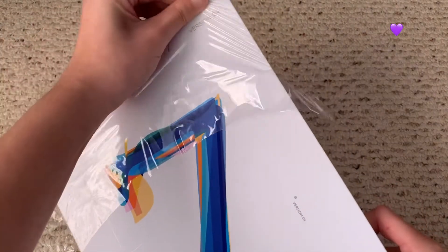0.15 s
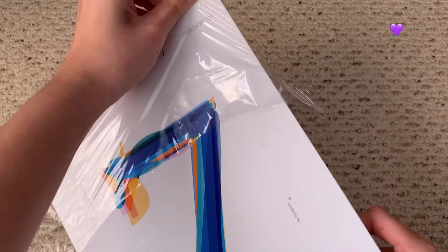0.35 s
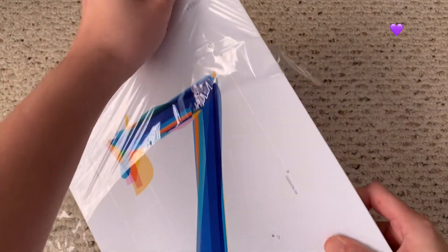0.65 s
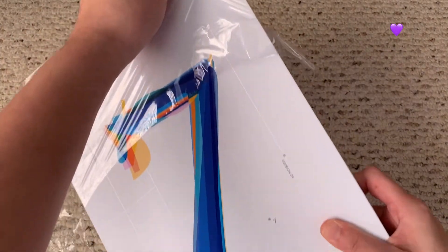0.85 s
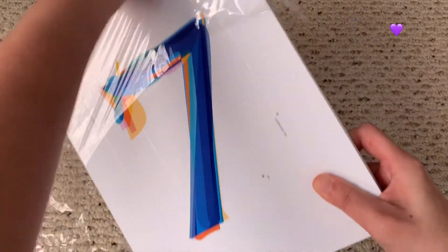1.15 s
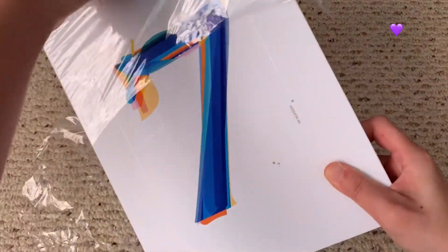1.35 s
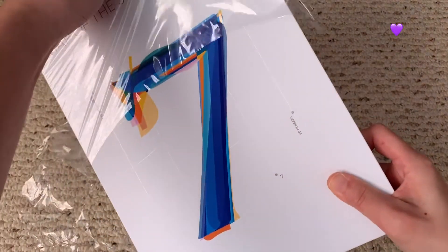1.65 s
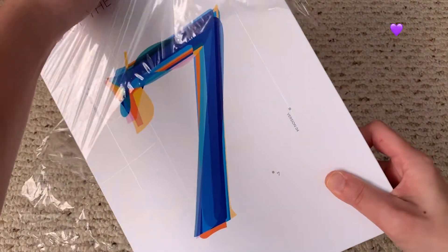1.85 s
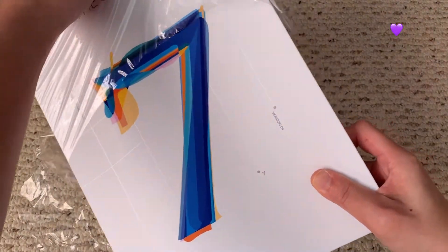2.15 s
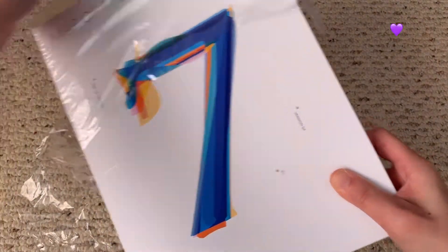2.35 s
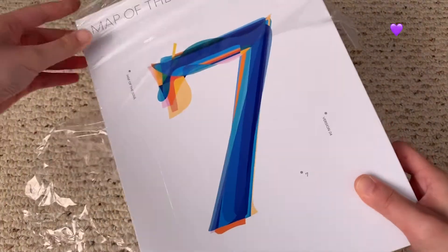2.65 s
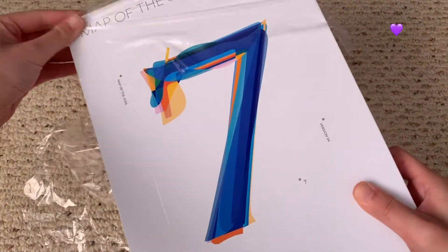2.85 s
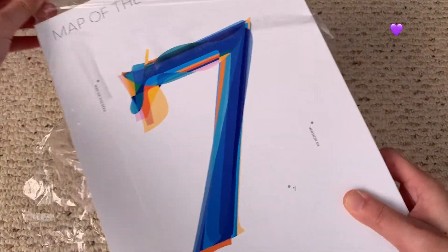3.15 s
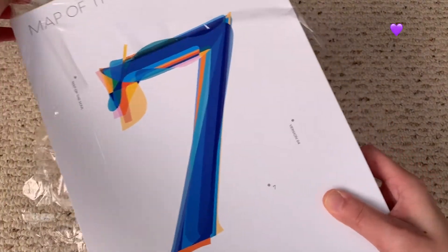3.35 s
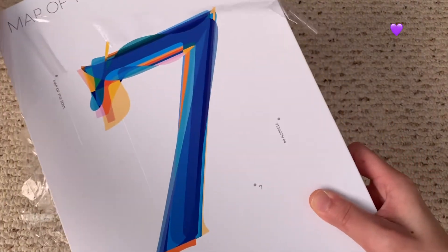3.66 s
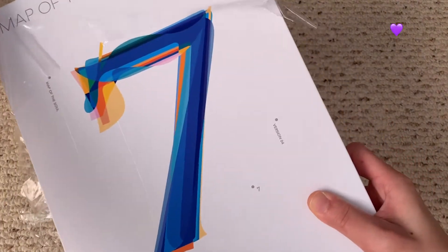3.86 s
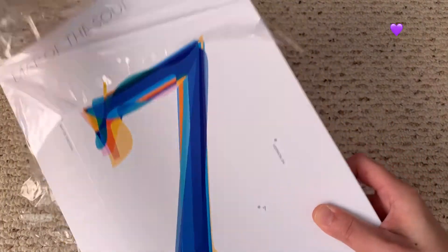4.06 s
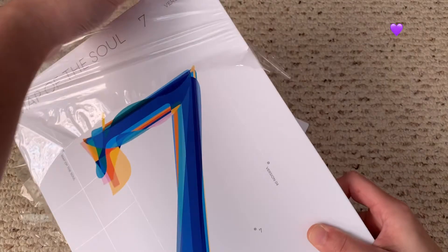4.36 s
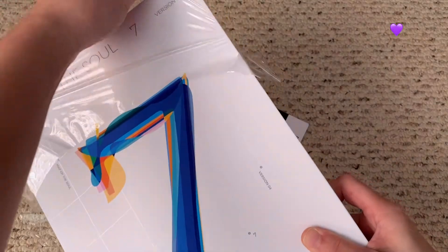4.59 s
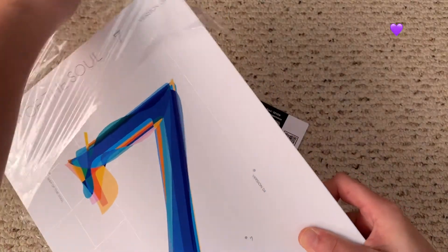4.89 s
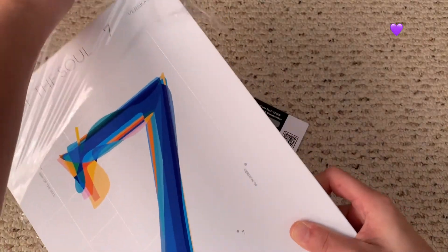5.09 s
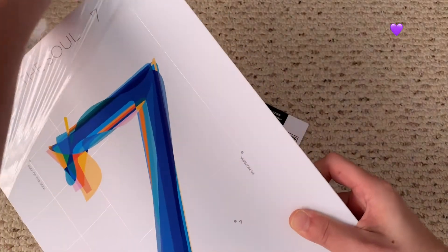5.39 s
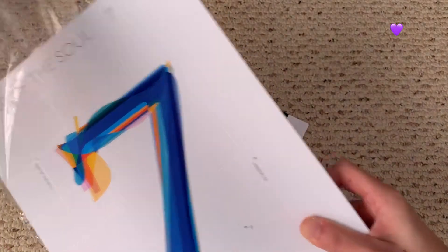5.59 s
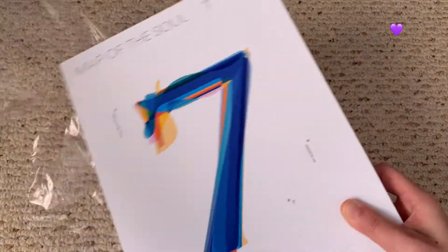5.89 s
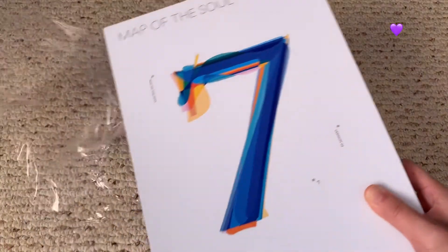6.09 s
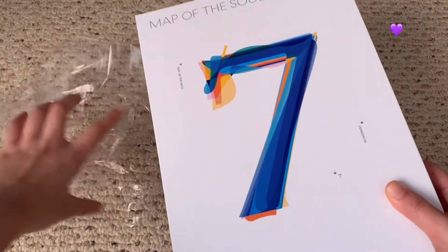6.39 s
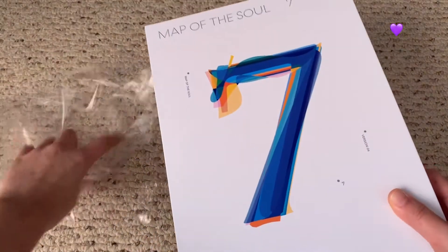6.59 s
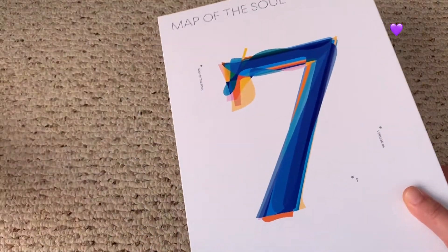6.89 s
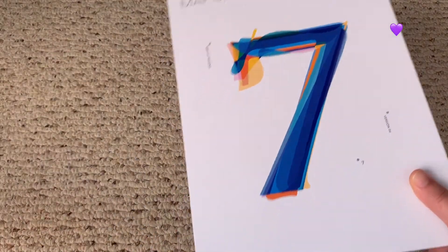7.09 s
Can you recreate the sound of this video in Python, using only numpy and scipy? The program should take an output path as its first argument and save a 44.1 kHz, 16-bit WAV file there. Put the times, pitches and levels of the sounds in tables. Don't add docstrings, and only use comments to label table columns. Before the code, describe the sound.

Thin plastic film crinkles and snaps in short bursts as it is peeled off a hollow cardboard box, pops loudly once, then rustles free.

```python
import sys
import numpy as np
from scipy import signal
from scipy.fft import rfft, irfft, next_fast_len
from scipy.io import wavfile
from scipy.ndimage import uniform_filter1d

SR = 44100
rng = np.random.default_rng(int(sys.argv[2]) if len(sys.argv) > 2 else 0)


def transcribe(u):
    v = np.clip(np.atleast_2d(u).T, -1, 1)
    q = np.round(v * 32767).astype(np.int16)
    wavfile.write(sys.argv[1], SR, q)


def volts_from_decibels(level):
    exponent = np.asarray(level, float) / 20
    return 10 ** exponent


N = 319128

FREE_S = 5.84
TAUT_HZ = 9440


def rms_one(x):
    return x / np.sqrt(np.mean(x ** 2) + 1e-20)


def in_time(rows):
    s, *columns = np.transpose(rows)
    return [np.interp(np.arange(N) / SR, s, column) for column in columns]


def at_hz(points, hz):
    point_hz, point_db = np.transpose(points)
    return np.interp(np.log(hz), np.log(point_hz), point_db)


def drift(rate):
    r = np.exp(-80 * np.pi * rate / SR)
    slow = signal.lfilter([1], [1, -2 * r, r * r], rng.standard_normal(N // 40 + 2002))[2000:]
    return np.interp(np.arange(N) / 40, np.arange(len(slow)), rms_one(slow))


def ring(push, hz, t60):
    r, w = volts_from_decibels(-60 / (t60 * SR)), 2 * np.pi * hz / SR
    return signal.lfilter([0, np.sin(w)], [1, -2 * r * np.cos(w), r * r], push + 1e-18)


def band(x, low_hz, high_hz):
    edges_hz = [low_hz, min(high_hz, .45 * SR)]
    return signal.sosfilt(signal.butter(2, edges_hz, "band", fs=SR, output="sos"), x)


def peak(x, hz, width_hz, db):
    g, w = volts_from_decibels(db / 2), 2 * np.pi * hz / SR
    a = np.pi * width_hz / SR
    return signal.lfilter([1 + a * g, -2 * np.cos(w), 1 - a * g], [1 + a / g, -2 * np.cos(w), 1 - a / g], x)


def clicks(per_s, spread_db, clump_db):
    sizes = volts_from_decibels(spread_db * np.minimum(rng.exponential(1, N), 5)) * rng.choice([-1, 1], N)
    chance = per_s * volts_from_decibels(clump_db * drift(25)) / SR
    return sizes * (rng.random(N) < chance)


def crinkle(spectrum, per_s, cycles, spread_db, clump_db, count=14):
    train = clicks(per_s, spread_db, clump_db)
    patch = rng.integers(0, count, N)
    total = np.zeros(N)
    for k, hz in enumerate(np.geomspace(spectrum[1][0], spectrum[-2][0], count)):
        total += volts_from_decibels(at_hz(spectrum, hz)) * hz * ring(train * (patch == k), hz, cycles / hz)
    return rms_one(total)


def room_tone():
    # (frequency [Hz], level per Hz [dB])
    air = [(18, -50), (30, 10.5), (79, 18.5), (216, 6.5), (1220, -18), (2560, -9.5), (4520, -16),
           (7590, -36), (8380, -21), (11000, -37), (14300, -19), (22000, -120)]
    size = next_fast_len(N)
    hz = np.maximum(np.fft.rfftfreq(size, 1 / SR), 10)
    mid, side = rfft(rng.standard_normal((2, size))) * volts_from_decibels(at_hz(air, hz))
    alike = 0.85 / (1 + (hz / 700) ** 3)
    both = np.sqrt(1 + alike) * mid + np.sqrt(1 - alike) * side * [[1], [-1]]
    return volts_from_decibels(-75) * rms_one(irfft(both, size)[:, :N])


def room(x):
    t60_s, wall_cut_hz = .22, 10000
    size = next_fast_len(N + SR)
    w = 2 * np.pi * np.fft.rfftfreq(size)
    dull = 1 / (1 + 1j * w * SR / (2 * np.pi * wall_cut_hz))
    walls = np.zeros((2, len(w)), complex)
    for k, lag in enumerate((rng.uniform(.004, .03, 16) * SR).astype(int)):
        loop = volts_from_decibels(-60 * lag / SR / t60_s) * np.sqrt(dull) * np.exp(-1j * w * lag)
        walls[k % 2] += (-1) ** (k // 2) * loop / (1 - loop)
    walls /= np.sqrt(np.mean(np.abs(walls) ** 2, axis=1, keepdims=True))
    tail = irfft(rfft(x, size) * walls, size)[:, :N]
    return band(band(tail, 1800, 21000), 234, 25000)


def bumps():
    # (time [s], peak level [dB])
    shifts = [(1.195, -57.5), (1.548, -64), (2.239, -59), (2.745, -69), (2.896, -57), (2.994, -67),
              (3.939, -61.5), (4.463, -65), (4.638, -62), (4.728, -55), (5.513, -51), (6.438, -68.5),
              (6.62, -59.5), (6.75, -60), (1.37, -63.5), (5.75, -67.5), (7.09, -61)]
    push = np.zeros(N)
    for s, db in shifts:
        push[round(s * SR)] = volts_from_decibels(db + 6.5)
    push = band(push, 32, 260)
    return ring(push, 85, 0.17) + volts_from_decibels(-2) * ring(push, 144, 0.2)


def box(push):
    # (frequency [Hz], level [dB], time to fall 60 dB [s])
    modes = [(185.4, -8.5, 0.026), (292.6, -3.5, 0.039), (381, -2, 0.042), (578, 1, 0.013),
             (810, -3.5, 0.019), (1213, -1, 0.0095)]
    return sum((-1) ** k * volts_from_decibels(db) * ring(push, hz, t60) for k, (hz, db, t60) in enumerate(modes))


def knocks(snapped):
    # (time [s], peak level [dB])
    tugs = [(0.113, -49.5), (0.186, -56.5), (0.251, -43.5), (0.271, -48.5), (0.972, -51.5), (1.199, -40),
            (1.265, -42.5), (1.35, -56), (1.536, -46.5), (1.608, -51.5), (1.879, -58), (2.233, -50),
            (2.248, -39.5), (2.622, -64), (2.748, -55), (2.896, -45), (3.013, -49), (3.034, -47.5),
            (3.076, -42), (3.108, -43.5), (3.183, -48.5), (3.905, -52), (3.922, -47), (3.964, -45.5),
            (4.376, -53), (4.465, -52), (4.627, -39), (4.746, -41), (5.519, -36), (5.537, -45)]
    late_s, answer_db = 0.00399, -21
    answers = [(s + late_s, coarse_db + answer_db) for s, db, hz, coarse_db in snapped]
    s, db = np.transpose(tugs + answers)
    push = np.zeros(N)
    np.add.at(push, ((s - .004) * SR).astype(int), volts_from_decibels(db + 5.5) * rng.choice([-1, 1], len(s)))
    return box(band(push, 67, 1500))


def handling():
    # (time [s], level [dB])
    tension = [(0, -60), (.3, -74), (.8, -79), (1.1, -66.5), (1.77, -73), (2.35, -81), (2.69, -82),
               (3.26, -68), (3.57, -72), (3.86, -71), (4.03, -85), (4.3, -85), (4.6, -64), (5.07, -72),
               (5.48, -58), (5.96, -64), (6.4, -71), (7.24, -61)]
    # (peak time [s], fine crinkle [dB], time to fade 20 dB [s],
    # large folds against fine crinkle [dB])
    pulls = [(.07, -52.5, .26, -12), (.26, -44.5, .055, -5.5), (.375, -63.5, 0.2, -15),
             (.53, -72, 0.5, -10), (.75, -72.5, 0.4, 2.5), (.86, -68, 1, -20), (.98, -57, 0.18, -3),
             (1.2, -47.5, 0.34, -2.5), (1.44, -49, .24, -5), (1.549, -51.5, 0.29, -1.5),
             (1.89, -61, 0.15, -1.5), (2.244, -40.5, .06, -6), (2.77, -48.5, .4, -12),
             (2.9, -46.5, 0.12, -10), (3.009, -45.5, 0.28, -6), (3.11, -51, 0.18, -5),
             (3.42, -62.5, .33, -10), (3.69, -62, 0.36, -13), (3.915, -42, 0.0665, 0.5),
             (4.38, -53, 0.42, 0), (4.46, -55.5, .11, -4), (4.629, -44.5, .24, 1), (4.74, -49.5, 0.1165, 3),
             (2.195, -53.5, 0.11, -5), (5.55, -47, .2, -3), (5.7, -47.5, 0.27, -10),
             (1.35, -58.5, 0.24, 5.5), (1.64, -60.5, 0.16, -1), (3.959, -47, 0.05, -8),
             (4.341, -58.5, .2, 0.5)]
    # (peak time [s], fine crinkle [dB],
    # time to fade 20 dB [s], large folds against fine crinkle [dB])
    swings = [(5.88, -54.5, .11, -8.5), (6.04, -60, .31, -7), (6.12, -53.5, .21, -12.5),
              (6.19, -45.5, .25, -17.5), (6.27, -53.5, .13, -12.5), (6.325, -52.5, .045, -9.5),
              (6.45, -60.5, .31, -17.5), (6.575, -43, .31, -9), (6.635, -39, .27, -7),
              (6.72, -47.5, .17, -10.5), (6.83, -55, .3, -5), (6.915, -50, .18, -5), (6.965, -55, .08, -5),
              (7.1, -65, .3, -6)]
    creep_fold_db, creep_rub_db = -9, -15
    pull_rub_db = -3
    free_rub_db = -5
    t = np.arange(0, N, 64) / SR
    creep = volts_from_decibels(np.interp(t, *np.transpose(tension)))
    s, db, fade_s, fold_db = np.transpose(pulls + swings)[:, :, None]
    rise = np.where(s > FREE_S, 167, 400)
    below_peak_db = np.where(t < s, rise * (s - t), 20 * (t - s) / fade_s)
    pull = volts_from_decibels(db - below_peak_db)
    folded = np.sum((pull * volts_from_decibels(fold_db)) ** 2, axis=0)
    held = volts_from_decibels(free_rub_db * (t > FREE_S))
    fine_power = creep ** 2 + np.sum(pull ** 2, axis=0)
    fold_power = (creep * volts_from_decibels(creep_fold_db)) ** 2 + folded
    rub_power = ((creep * volts_from_decibels(creep_rub_db)) ** 2 + folded * volts_from_decibels(pull_rub_db) ** 2) * held ** 2
    return in_time(np.column_stack([t, *(10 * np.log10([fine_power, fold_power, rub_power]))]))


def rubbing(rub_db):
    return volts_from_decibels(rub_db - 4) * rms_one(box(clicks(per_s=1200, spread_db=5.5, clump_db=3.5)))


def folds(fold_db):
    # (frequency [Hz], level per Hz [dB])
    coarse = [(410, -30), (700, -3), (1200, 2), (1700, -22.5), (2500, 12), (3200, 12.5), (4300, -25)]
    return volts_from_decibels(fold_db - 7) * crinkle(coarse, per_s=2500, cycles=1.2, spread_db=2.5, clump_db=6.0, count=10)


def ticks():
    train = clicks(per_s=450, spread_db=2.2, clump_db=4.0)
    slips = signal.lfilter([1], [1, -.93], np.abs(train)) * rng.standard_normal(N)
    return rms_one(band(slips, 7200, 19000))


def rustle(fine_db):
    # (frequency [Hz], level per Hz [dB])
    small = [(2000, -30), (3200, 12), (4300, 4.5), (5500, -18.5), (7000, 11), (8600, -2), (10500, 12.5),
             (13000, 7), (15500, -16.5), (17000, -10)]
    # (frequency [Hz], width [Hz], lift [dB])
    free_ring = (4200, 1800, 2.5)
    shared = crinkle(small, per_s=3500, cycles=8.0, spread_db=3.5, clump_db=5.0)
    own = np.array([crinkle(small, per_s=6000, cycles=8.3, spread_db=3.0, clump_db=5.5, count=9)
                    for port in "LR"])
    fine = volts_from_decibels(fine_db - 3) * (shared + volts_from_decibels(-3) * own + volts_from_decibels(-4.5) * ticks())
    return np.where(np.arange(N) > FREE_S * SR, peak(fine, *free_ring), fine)


def creases():
    # (time [s], bright snap peak [dB], pitch [Hz], coarse part [dB])
    wide = [(.0163, -27, 8200, -76), (.0695, -37, 8100, -70), (.1986, -44, 4860, -70),
            (.472, -56.5, 4500, -77), (.638, -48.5, 3440, -87), (.732, -42.5, 2800, -43),
            (1.3105, -37.5, 3700, -46), (1.5436, -39, 7450, -42), (1.876, -51, 3000, -49),
            (2.8998, -39, 2900, -51), (3.4058, -51, 3140, -51), (3.4672, -49, 4050, -67),
            (3.5889, -48, 3430, -51), (3.7333, -45.5, 4130, -44.5), (4.0497, -44, 7140, -78),
            (4.2454, -65, 3000, -71), (4.39, -38.5, 5000, -63), (5.4722, -39, 8300, -71),
            (5.5156, -24, 3340, -34), (5.6753, -32.5, 3020, -38), (5.6915, -37.5, 7100, -61),
            (5.8321, -45.5, 4700, -53), (5.8654, -35.5, 6460, -44), (5.9366, -48, 7100, -58),
            (6.0469, -40, 6100, -86), (6.1053, -40, 6540, -53.5), (6.3291, -38.5, 4200, -66),
            (6.4106, -53, 3350, -78), (6.4291, -42, 3680, -57), (6.5269, -44, 3300, -55)]
    # (time [s], bright snap peak [dB], coarse part [dB])
    taut = [(0.0295, -31, -65), (0.108, -29, -43.5), (0.151, -32, -48.5), (0.1743, -40.5, -58),
            (.239, -31, -37.5), (.846, -38, -91), (0.869, -44, -86), (.9055, -37.5, -69),
            (0.9654, -33, -43), (0.9784, -35, -64), (1.044, -48, -62), (1.1313, -38, -59),
            (1.2739, -36.5, -42), (1.4286, -37, -55), (2.0403, -58.5, -61), (2.099, -61, -56.5),
            (2.753, -41.5, -60), (3.1778, -38, -49), (3.68, -34.5, -52.5), (3.9041, -37, -44),
            (4.3632, -37.5, -52), (4.6232, -35, -34.5), (4.7588, -37.5, -46), (4.9685, -47, -54),
            (5.7603, -32, -67), (5.793, -38, -61), (5.9993, -43, -62), (6.1586, -36, -49),
            (6.1888, -35, -61), (6.449, -42, -67)]
    # (time [s], bright snap peak [dB], coarse part [dB])
    tiny = [(.0088, -43, -68), (.321, -39, -76), (.3601, -36, -48), (.514, -37.5, -54),
            (0.5882, -51.5, -66), (1.0572, -52, -62), (1.1674, -32.5, -47), (1.196, -28.5, -41),
            (2.2371, -24.5, -48), (2.4729, -54, -83), (2.7328, -47, -59.5), (2.774, -32.5, -71),
            (2.826, -32.5, -71), (2.892, -33, -54), (2.9773, -32.5, -59), (3.1045, -30, -37),
            (3.2117, -39.5, -57), (3.5083, -41, -63), (3.9592, -29, -47), (4.332, -44, -53),
            (4.461, -40, -46), (4.6157, -29.5, -32.5), (4.7832, -38, -53), (4.862, -34.5, -52),
            (5.4584, -42, -86.5), (5.4931, -31, -65), (6.1195, -36, -53.5), (6.3191, -43, -50),
            (6.7343, -38, -55), (7.209, -45, -58)]
    # (time [s], bright snap peak [dB], coarse part [dB])
    weak = [(2.247, -33, -48), (.08, -38, -76), (.1011, -46, -75), (0.2785, -35, -45), (1.0252, -45, -52),
            (1.1073, -50, -49), (1.157, -46, -65), (1.661, -49, -57), (1.758, -56, -62), (2.1239, -54, -57),
            (2.194, -53, -47.5), (2.667, -63, -72), (3.2809, -52, -62.5), (2.1421, -50.5, -71),
            (3.816, -60, -66), (3.839, -57.5, -74), (4.189, -66, -80), (4.31, -69, -61), (2.2735, -41, -70),
            (4.569, -42.5, -49), (4.6289, -32, -36), (4.8527, -41, -53), (4.916, -48, -70),
            (4.937, -42, -59), (5.129, -56, -67), (5.2604, -49.5, -66), (5.3885, -50, -62),
            (6.0854, -45, -55), (6.5191, -49, -65), (7.1866, -48, -62)]
    rows = list(wide)
    for kind_hz, kind in [(TAUT_HZ, taut), (13100, tiny), (10600, weak)]:
        for s, db, coarse_db in kind:
            hz = kind_hz * (1 + .05 * rng.normal())
            rows.append((s, db, hz, coarse_db))
    return rows


def snaps(table, size=600):
    film = np.zeros((2, N + size))
    t = np.arange(size) / SR - .0014
    fade_out = np.cos(np.pi / 2 * np.arange(size) / size)
    settle = (t > 0) * np.exp(-np.abs(t) / .005) * fade_out
    quick = np.exp(-np.abs(t) / np.where(t < 0, .0005, .0006)) + .17 * settle
    slow = np.exp(-np.abs(t) / np.where(t < 0, .0006, .0015)) + .25 * settle
    slips = rng.standard_normal((len(table), 3, size))
    broads = band(band(slips[:, :2] * quick, 4000, 17000), 4000, 19000)
    strokes = band(band(slips[:, :2] * quick, 2400, 19000), 2200, 19500)
    coarses = band(slips[:, 2] * slow, 950, 3200)
    for row, slip, stroke, broad, coarse in zip(table, slips, strokes, broads, coarses):
        s, bright_db, hz, coarse_db = row
        i = round((s + t[0]) * SR)
        broad_share = 1.3 * min(hz / TAUT_HZ, 1) ** .5
        bright = rms_one(ring(stroke, hz, 6 / hz)) + broad_share * rms_one(broad)
        bright[1] = .8 * bright[0] + .6 * bright[1]
        bright[1] = np.roll(bright[1], round(2 * slip[2, 0]))
        film[:, i:i + size] += volts_from_decibels(bright_db + 8) * bright / np.abs(bright).max()
        film[:, i:i + size] += volts_from_decibels(coarse_db + 5) * coarse / np.abs(coarse).max()
    return film[:, :N]


def pop(size=8192):
    # (frequency [Hz], level per Hz [dB])
    colour = [(600, -20), (850, -4), (1400, 2), (3300, 0), (5000, -4), (7000, -11), (13000, -8),
              (16500, -18)]
    # (frequency [Hz], level [dB], time to fall 60 dB [s])
    lid_ring = (385, -22, .018)
    # (time constant [s], level [dB])
    stages = [
        (.0007, 0),
        (.006, -16),
        (.03, -25),
    ]
    pop_s, pop_db = 5.5153, -6.5
    t = np.arange(size) / SR - .003
    hz = np.maximum(np.fft.rfftfreq(size, 1 / SR), 10)
    noise = irfft(rfft(rng.standard_normal((3, size))) * volts_from_decibels(at_hz([(200, -45)] + colour, hz)), size)
    (crack_s, crack_db), *tails = stages
    swell, after = np.exp(np.minimum(t, 0) / 0.0004), np.maximum(t, 0)
    crack = noise[0] * swell * np.exp(-after / crack_s)
    hiss = noise[1:] * swell * sum(volts_from_decibels(db) * np.exp(-after / s) for s, db in tails)
    lid_hz, lid_db, t60 = lid_ring
    push = np.exp(-((t - .0006) / 0.0004) ** 2)
    lid = ring(band(push, 220, 900), lid_hz, t60)
    burst = volts_from_decibels(pop_db) * (crack + hiss) / np.abs(crack).max() + volts_from_decibels(lid_db) * lid / np.abs(lid).max()
    out, i = np.zeros((2, N)), round((pop_s + t[0]) * SR)
    out[:, i:i + size] = burst
    return out


def turned(x):
    # (frequency [Hz], angle [radians])
    port_turn = [(60, -0.1), (170, .1), (500, .15), (860, .75), (1200, .65), (1900, .5), (2400, 0.01)]
    size = next_fast_len(N)
    hz = np.maximum(np.fft.rfftfreq(size, 1 / SR), 10)
    return irfft(rfft(x, size) * np.exp(1j * at_hz(port_turn, hz)), size)[:N]


def at_ports(left, right):
    return np.array([left, np.roll(turned(right), 9)])


def scene():
    # (time [s], bright snap peak [dB], pitch [Hz], coarse part [dB])
    crowd = [(0.0518, -39, 10400, -65), (0.0553, -40, 9100, -71), (0.0616, -42, 10500, -66),
             (0.7835, -56, 9000, -66), (0.155, -37, 8500, -62), (1.4139, -44, 9000, -60),
             (0.9135, -49, 7500, -72), (1.2064, -37, 10200, -63), (1.2185, -38, 9000, -58),
             (1.253, -40, 10200, -54), (1.4341, -32, 8200, -57), (1.5633, -41, 9000, -62),
             (2.718, -52, 9500, -62), (2.2025, -44, 9000, -50), (2.2207, -39, 8400, -54),
             (2.2415, -32, 9500, -53), (2.3031, -44, 9600, -67), (2.785, -41, 13200, -57),
             (2.7927, -41, 13200, -63), (2.868, -36, 9600, -61), (2.9457, -45, 13000, -77),
             (2.965, -44, 9600, -63), (2.9724, -39, 10500, -64), (2.9949, -36, 9400, -60),
             (3.1234, -39, 10500, -59), (3.1407, -42, 9100, -56), (3.8835, -36, 13500, -61),
             (3.888, -40, 12500, -60), (4.3255, -51, 10000, -62), (4.4209, -42, 10300, -61),
             (4.4381, -42, 10200, -65), (4.5763, -40, 8500, -62), (4.6055, -35, 13000, -59),
             (4.6542, -36, 10000, -49), (4.733, -37, 13300, -58), (4.7421, -36, 10300, -52),
             (4.8062, -46, 10200, -65), (5.5032, -34, 10300, -52), (5.5872, -36, 13800, -53),
             (6.1128, -41, 9400, -53), (6.1254, -42, 9600, -61), (6.172, -37, 8300, -58),
             (6.1965, -35, 8700, -58), (6.2057, -38, 8400, -63), (6.3074, -43, 9800, -74),
             (6.5755, -34, 13500, -63), (6.6054, -32, 13300, -58), (6.9673, -40, 10300, -64)]
    # (time [s], bright snap peak [dB], pitch [Hz], coarse part [dB])
    stray = [(2.0102, -62, 9000, -80), (2.393, -62, 4000, -66), (2.4406, -66, 9000, -85),
             (2.5258, -64, 9000, -76), (2.6071, -64, 9000, -80), (2.619, -60, 8000, -80),
             (3.7893, -52, 9000, -66), (4.8423, -47, 10000, -70), (5.0154, -55, 9000, -64),
             (5.9724, -48, 9000, -64), (5.9881, -49, 8000, -62), (7.1622, -50, 9000, -58)]
    # (frequency [Hz], width [Hz], difference [dB])
    ports = [(1000, 2300, 4), (2700, 1800, 3.5), (8230, 8200, -2.5)]
    fine_db, fold_db, rub_db = handling()
    moving = rustle(fine_db) + folds(fold_db) + rubbing(rub_db)
    jerks = volts_from_decibels(1.95 * drift(14))
    snapped = creases()
    film = snaps(snapped) + snaps(crowd) + snaps(stray) + jerks * moving
    left, right = film + knocks(snapped) + bumps() + pop()
    for hz, width_hz, db in ports:
        left = peak(left, hz, width_hz, db / 2)
        right = peak(right, hz, width_hz, -db / 2)
    return at_ports(left, right) + volts_from_decibels(-13) * room(left + right) + room_tone()


def band_limit(x):
    return signal.sosfilt(signal.butter(12, 16810, fs=SR, output="sos"), x)


def record(dry):
    x = signal.sosfilt(signal.butter(2, 42, "high", fs=SR, output="sos"), dry)
    x = peak(peak(x, 13300, 2000, 3), 11750, 700, -2.5)
    dip = signal.cheby2(4, 32, [11400, 12000], "bandstop", fs=SR, output="sos")
    step = signal.cheby2(14, 45, 14600, fs=SR, output="sos")
    strong = signal.sosfiltfilt(np.vstack([dip, step]), x)
    power = np.sum(np.diff(x, prepend=0) ** 2, axis=0)
    attack = uniform_filter1d(power, 64) > 5.8 * uniform_filter1d(power, 1500)
    passing = np.minimum(uniform_filter1d(1. * attack, 1300) * 400, 1)
    passing = uniform_filter1d(passing, 300)
    x = strong + volts_from_decibels(-5.5) * passing * (x - strong)
    gap = signal.cheby2(3, 25, [2400, 2800], "bandstop", fs=SR, output="sos")
    dropped = np.clip(4 * (drift(6) - .9), 0, 1) * (1 - passing)
    x = x + dropped * (signal.sosfiltfilt(gap, x) - x)
    x = signal.sosfilt(signal.cheby2(12, 70, 16800, fs=SR, output="sos"), x)
    return band_limit(x)


dry = scene()
out = record(dry)
transcribe(out)
```